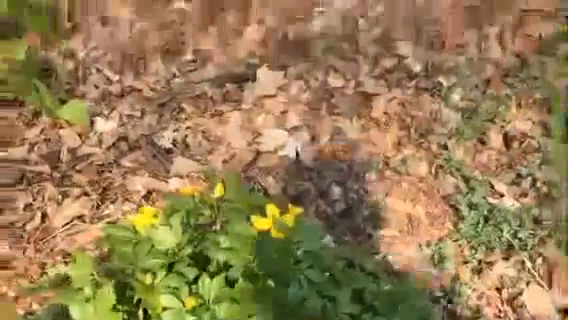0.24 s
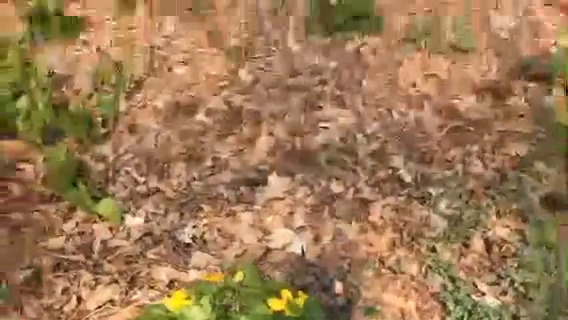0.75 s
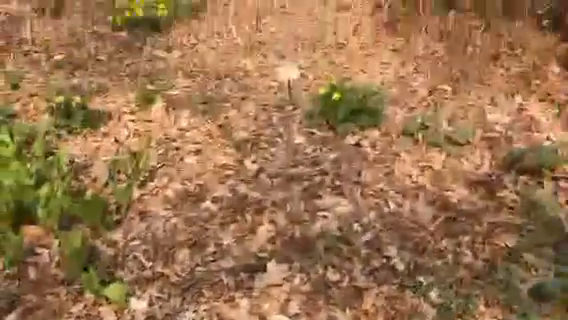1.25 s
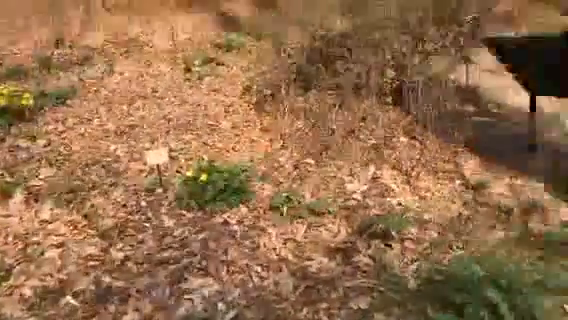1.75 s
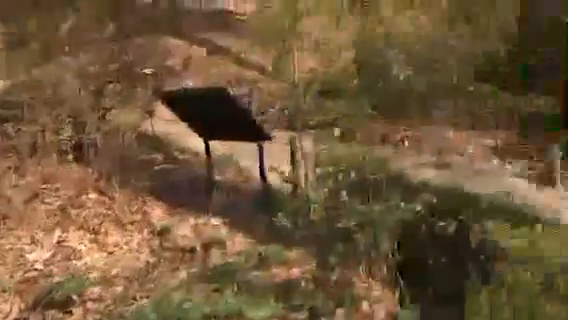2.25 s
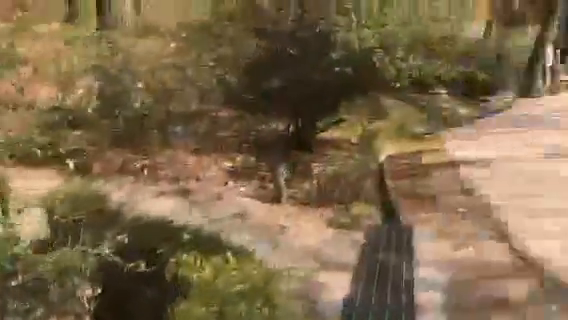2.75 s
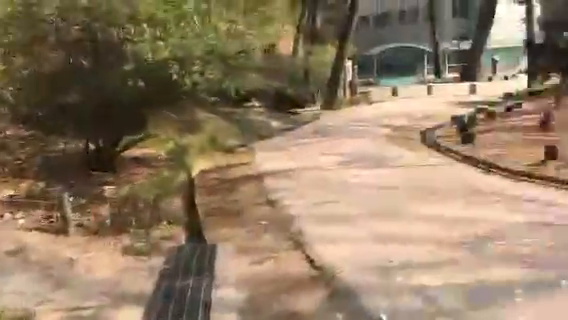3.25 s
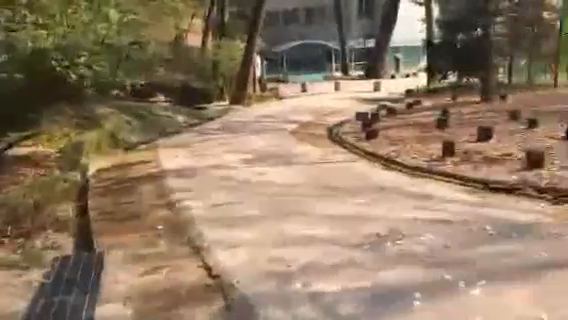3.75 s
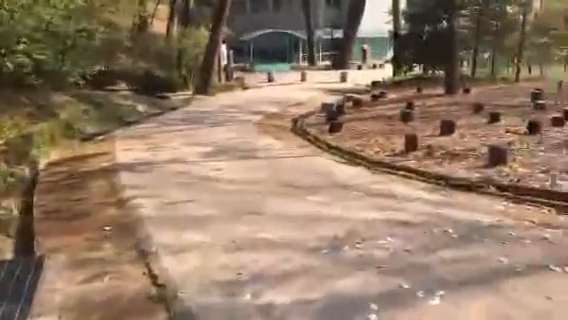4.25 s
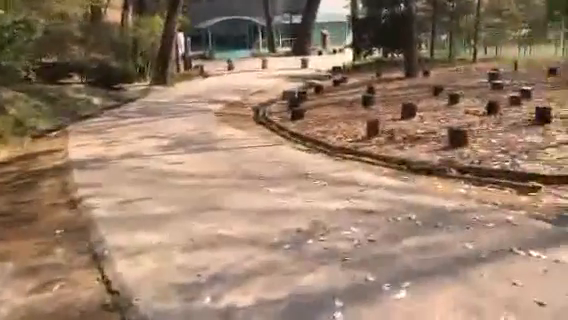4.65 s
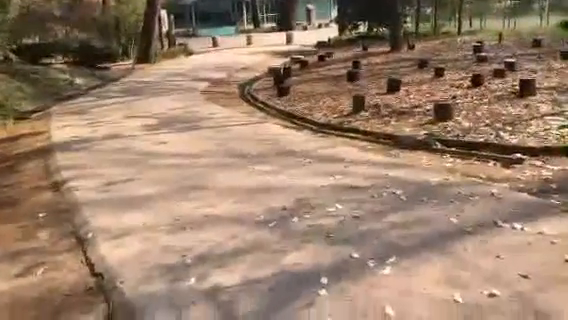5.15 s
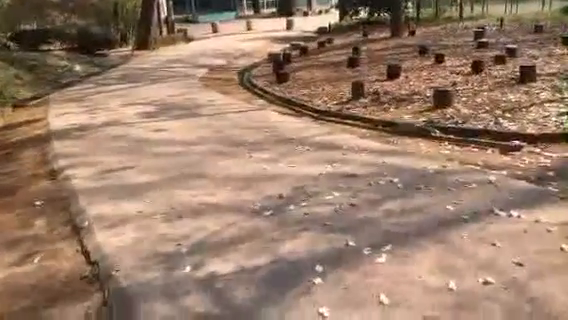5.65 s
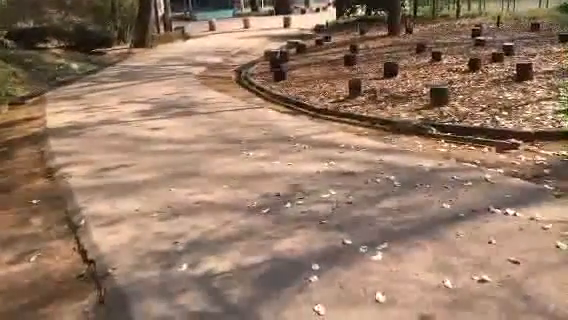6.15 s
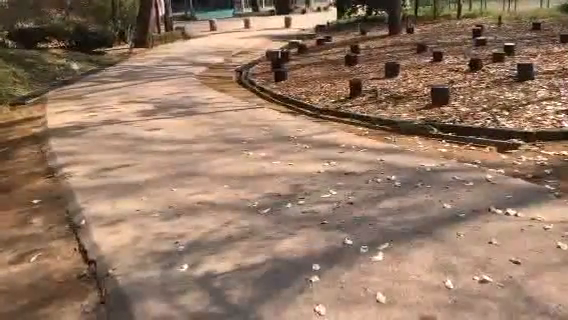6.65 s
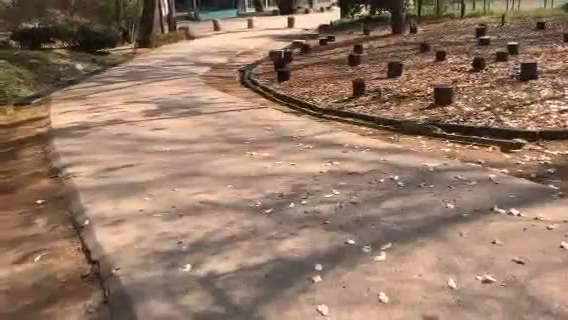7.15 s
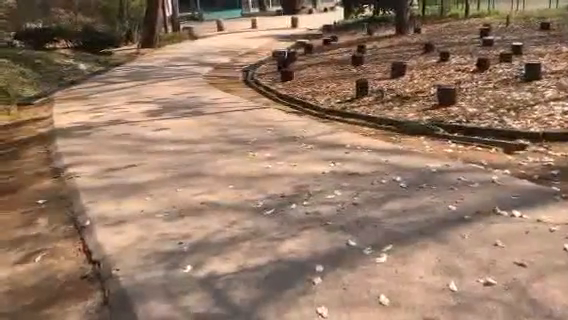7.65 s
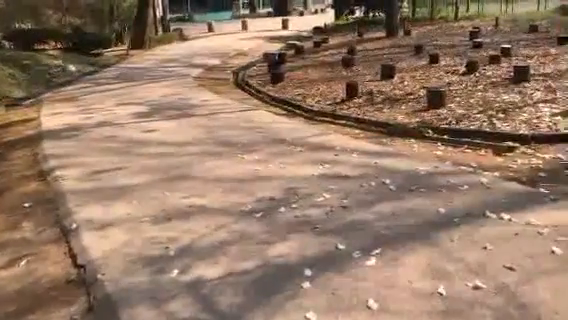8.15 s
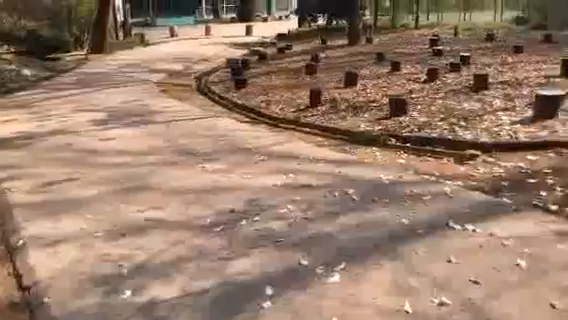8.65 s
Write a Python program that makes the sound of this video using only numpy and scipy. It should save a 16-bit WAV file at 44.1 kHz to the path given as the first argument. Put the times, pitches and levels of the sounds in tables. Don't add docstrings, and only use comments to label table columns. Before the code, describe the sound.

A quiet park captured by a hand-held phone, both channels nearly identical and treble muffled. Throughout, a faint wavering low machine hum sits over soft town hiss and swelling distant traffic rumble. From 0 s feet rasp dry leaves and grit; sharp twig cracks cluster at 0.6-0.8 s, with lighter scuffs and snaps until about 4.4 s. Two short buzzing bird calls open, returning around 2 and 3 s. From 0.45 to 2.5 s a small bird repeats held whistles, steep high notes and quick falling notes, echoing in the trees; fainter slurred chirps surround it. At 4.5 and 4.9 s the phone case is knocked hard, two sharp clacks with dull thumps and rattles fading by 5.3 s. The bird sings a second, steadier phrase from 5.35 to 7.9 s over little foot noise. From 7.8 to 8.6 s fingers tick the case with leaf scuffs and low bumps; a last faint buzz ends at 8.9 s.

```python
import sys
import numpy as np
from scipy import signal
from scipy.fft import rfft, irfft, next_fast_len
from scipy.io import wavfile
from scipy.ndimage import uniform_filter1d

SR = 44100
rng = np.random.default_rng(int(sys.argv[2]) if len(sys.argv) > 2 else 0)


def nominal_scale(level):
    x = np.asarray(level, float) / 20
    return 10 ** x


def generate_wav(signal):
    frames = np.transpose(np.atleast_2d(signal))
    scaled = np.clip(frames, -1, 1) * 32767
    pcm = np.round(scaled).astype(np.int16)
    wavfile.write(sys.argv[1], SR, pcm)


N = 392049
T = np.arange(N) / SR


def level(x, db):
    return x * nominal_scale(db) / np.sqrt(np.mean(x ** 2))


def add(track, s, sound):
    i = int(s * SR)
    track[i:i + len(sound)] += sound[:N - i]


def colour(x, points):
    hz, db = np.transpose(points)
    size = next_fast_len(len(x))
    bins = np.maximum(np.arange(size // 2 + 1) * SR / size, 1)
    gain = nominal_scale(np.interp(np.log(bins), np.log(hz), db, left=-60, right=-80))
    return irfft(rfft(x, size) * gain, size)[:len(x)]


def ring(x, hz, width):
    return signal.lfilter(*signal.iirpeak(min(hz, .45 * SR), hz / width, SR), x)


def walk(rate):
    k = int(SR / rate)
    steps = np.repeat(rng.standard_normal(N // k + 1), k)
    return 1.32 * uniform_filter1d(uniform_filter1d(steps, k), k)[:N]


def tone(hz, edge):
    sine = np.sqrt(2) * np.sin(2 * np.pi * np.cumsum(hz) / SR)
    return sine * signal.windows.tukey(len(hz), np.clip(edge, 0, 1))


def glide(length, *hz):
    return np.interp(np.linspace(0, len(hz) - 1, int(length * SR)), np.arange(len(hz)), hz)


# pitch_hz, density_db (per Hz)
TOWN_SPECTRUM = [(27, -14.5), (58, -1), (85, -6.5), (150, -14.5), (220, -16), (350, -23.5), (600, -23.5),
                 (950, -22), (1600, -31.5), (2500, -38.5), (4000, -37), (5050, -41.5), (7300, -42),
                 (7900, -47.5)]
# time_s, level_db
RUMBLE_SWELL = [(0.0, -60), (0.47, -57), (3.12, -53.5), (3.49, -61), (4.95, -51.5), (5.45, -60.5),
                (6.07, -49.5), (6.49, -66.5), (6.96, -48), (7.01, -62), (7.57, -49), (8.18, -59.5),
                (8.33, -43), (8.39, -62), (8.57, -52), (8.89, -64)]
# time_s, level_db
VEHICLE_SWELL = [(0, -80.5), (2.5, -69.5), (5.5, -67.5), (7, -66), (8.89, -69)]


def town():
    hiss = level(colour(rng.standard_normal(N), TOWN_SPECTRUM), -55.5) * nominal_scale(0.27 * walk(0.92))

    s, db = np.transpose(RUMBLE_SWELL)
    rumble = level(ring(ring(rng.standard_normal(N), 58, 22), 58, 45), -1.5)
    rumble = rumble * nominal_scale(np.interp(T, s, db) + 1.5 * walk(6.5))

    hum_hz = 116.1 + 0.58 * walk(3)
    hum = np.sqrt(2) * np.sin(2 * np.pi * np.cumsum(hum_hz) / SR) * nominal_scale(-58.5 + 1.4 * walk(5))

    s, db = np.transpose(VEHICLE_SWELL)
    vehicle = level(ring(ring(rng.standard_normal(N), 250, 190), 270, 400), 0) * nominal_scale(np.interp(T, s, db))
    return hiss + rumble + hum + vehicle


def trees(x, wet_db, t60, branches=4.5, flutter_db=3.5):
    t = T[:SR * 3 // 4]
    fade = nominal_scale(-60 * t / t60) + branches * np.exp(-t / 0.008)
    tail = rng.standard_normal(len(t)) * fade * (1 - np.exp(-t / 0.0024))
    wet = signal.fftconvolve(x, tail / np.sqrt(np.sum(tail ** 2)))[:N]
    return x * nominal_scale(flutter_db * walk(150)) + nominal_scale(wet_db + 2.5 * walk(45)) * wet


# start_s, length_s, from_hz, to_hz, level_db
SLURRED_NOTES = [(1.008, 0.097, 4800, 3350, -72), (1.29, 0.08, 3800, 3130, -74),
                 (1.49, 0.048, 4750, 3800, -71), (1.552, 0.06, 3470, 3150, -75),
                 (1.615, 0.086, 3985, 3960, -66.5), (1.722, 0.06, 5080, 3700, -68),
                 (1.778, .08, 3650, 3170, -71), (2.244, 0.14, 3350, 3550, -78.5),
                 (2.899, 0.074, 3380, 3950, -70), (2.342, 0.014, 2500, 3700, -72),
                 (1.733, .014, 3600, 2500, -74), (6.598, .035, 3150, 3750, -71.5),
                 (3.555, 0.024, 2900, 3450, -79), (3.75, 0.15, 4290, 4240, -80.5),
                 (3.997, 0.059, 3300, 3840, -81), (4.023, 0.17, 4370, 4350, -82),
                 (4.27, 0.16, 4390, 4330, -81.5), (0.69, 0.29, 530, 528, -77.5)]
# start_s, length_s, centre_hz, level_db, far (1 if hidden in the trees)
BUZZING_CALLS = [(0.061, 0.031, 4050, -55.5, 0), (0.147, 0.043, 3950, -56.5, 0),
                 (1.92, 0.046, 4000, -62, 0), (2.046, 0.04, 3900, -59, 0), (2.152, 0.044, 4020, -61.5, 0),
                 (2.855, 0.037, 3970, -64, 1), (2.914, 0.038, 4130, -66.5, 1),
                 (2.969, 0.032, 3900, -65.5, 1), (3.04, .04, 4150, -72, 1), (3.105, 0.03, 3900, -68, 1),
                 (3.246, 0.04, 3930, -69.5, 1), (8.847, 0.037, 3770, -64, 0.96)]


def other_birds():
    near, hidden, far = calls = np.zeros((3, N))
    for s, length, from_hz, to_hz, db in SLURRED_NOTES:
        add(far, s, nominal_scale(db) * tone(glide(length, from_hz, to_hz), 0.19))
    for s, length, hz, db, distant in BUZZING_CALLS:
        centre = glide(length, hz, .96 * hz, hz, 1.03 * hz, .96 * hz)
        swing = np.sin(2 * np.pi * np.cumsum(glide(length, 150, 175)) / SR)
        drop = glide(.012, .95 * hz, .55 * hz)
        pitch = np.append(centre * (1 + 0.15 * swing), drop)
        swell = np.linspace(.55, 1, len(swing)) ** 1.5
        throb = np.append(swell * (1 + 0.36 * swing), np.linspace(.4, .12, len(drop)))
        third_db = np.where(np.arange(len(pitch)) < len(swing), -13, -4)
        buzz = tone(pitch, 0.29) + nominal_scale(third_db) * tone(1.5 * pitch, .2)
        add(calls[int(distant > .5)], s, nominal_scale(db) * throb * buzz)
    near = trees(near, -8, 0.27)
    hidden = nominal_scale(-8.5) * trees(hidden, 10.5, 0.79, 1.5)
    return near + hidden + trees(far, -4, .7, 1.5, 2.2)


# start_s, length_s, level_db, swell_db (over the note), pitch_hz
HELD_WHISTLES = [(0.544, .114, -62, 8, 4010), (0.873, 0.112, -59.5, 4, 3948), (1.198, 0.145, -64, 2, 4043),
                 (1.538, 0.054, -60, -10, 3935), (1.864, 0.135, -62, 1, 3960),
                 (2.194, 0.115, -55.5, 8, 3982), (5.443, 0.098, -63, -3, 4065),
                 (5.774, 0.115, -61, -3, 4005), (6.089, 0.13, -56.5, -3, 3963),
                 (6.423, 0.098, -53, 3, 4004), (6.757, 0.096, -57, -3.5, 3980),
                 (7.083, 0.108, -55, 0, 3970), (7.42, 0.093, -54.5, 5, 3940), (7.772, 0.1, -59, 3, 4050)]
WHISTLE_HOOKS = .1, .165
# start_s, peak_db, lowest_hz, rise_db (level of the rise that follows)
STEEP_NOTES = [(1.0207, -59.5, 5410, -82), (1.3596, -56.5, 5580, -74.5), (1.6926, -59.5, 5650, -79.5),
               (2.019, -56, 5420, -74), (2.376, -52, 5430, -69.5), (5.602, -61.5, 5420, -87),
               (5.934, -57.5, 5430, -79.5), (6.2582, -56.5, 5830, -74.5), (6.5868, -53.5, 5840, -71.5),
               (6.915, -54.5, 5590, -76), (7.2504, -55.5, 5670, -75), (7.585, -56.5, 5840, -71.5)]
# start_s, peak_db
FALLING_NOTES = [(0.4454, -66), (1.104, -58.5), (1.437, -55.5), (1.7756, -55.5), (2.1062, -53.5),
                 (2.4536, -49.5), (5.35, -63.5), (5.684, -55.5), (6.0112, -51.5), (6.3393, -49),
                 (6.6658, -50), (6.999, -50), (7.325, -50), (7.6615, -48.5)]


def songbird():
    near, high, falls, echo = np.zeros((4, N))
    attack_s, release_s, hook_s, echo_t60_s = 0.04, 0.02, 0.013, 1.1
    second_phrase_s = 4
    for s, length, db, swell_db, hz in HELD_WHISTLES:
        t = T[:int(length * SR)]
        edge = np.maximum(np.maximum(1 - t / attack_s, 1 - (length - t) / release_s), 0)
        shape_db = db + 2 + swell_db * (t / length - .5) - 14 * edge
        hook = WHISTLE_HOOKS[int(s > second_phrase_s)] * np.exp(-t / hook_s)
        add(near, s, nominal_scale(shape_db) * tone(hz * (1 - hook), 0.024))
        t = T[:SR // 2]
        add(echo, s + length - .022, nominal_scale(db - 9 - 60 * t / echo_t60_s) * tone(hz + 0 * t, .1))

    for s, db, low_hz, rise_db in STEEP_NOTES:
        plunge = glide(0.022, 7300, 1.14 * low_hz, 1.035 * low_hz, 1.003 * low_hz, .985 * low_hz)
        plunge_db = db - 6.5 + glide(0.022, -10, -3, -0.5, 1, -2)
        add(high, s - .003, nominal_scale(plunge_db) * tone(plunge, 0.28))
        add(high, s + 0.023, nominal_scale(db - 12) * tone(glide(.009, 5400, 3900), 0.28))
        add(high, s + 0.062, nominal_scale(rise_db + 4.5) * tone(glide(0.026, 5100, 6500, 7300), 0.29))

    for s, db in FALLING_NOTES:
        fall = glide(.042, 5130, 5060, 4800, 4400, 4070, 3850)
        add(falls, s - .006, nominal_scale(db - 7 + glide(.042, 1.5, -2.5)) * tone(fall, 0.75))

    echo = echo * nominal_scale(5.5 * walk(120))
    near = trees(near, -10, .5, 2.5, 3)
    falls = trees(falls, 1.5, .9, 3.8, 4.4)
    high = nominal_scale(-2) * trees(high, 5.5, 0.82, 2.5, 4.5)
    return echo + near + falls + high


# pitch_hz, density_db (per Hz)
LEAF_SPECTRUM = [(300, -11), (700, 1), (1500, 2.5), (2800, -0.5), (5000, -4), (7000, -5), (7900, -14)]
# start_s, length_s, from_db, to_db, brightness_db
LEAF_SCUFFS = [(0, 0.23, -96, -75, 9.5), (0.244, 0.15, -72, -72.5, -10), (0.553, 0.15, -73, -59.5, 8),
               (0.679, 0.099, -68.5, -69, 8.5), (0.754, 0.14, -65, -75, 9), (0.84, 0.13, -66, -69.5, -14),
               (1.248, 0.12, -65.5, -68.5, -9), (1.913, 0.13, -59, -74, -0.5),
               (1.996, .25, -71.5, -70.5, 0.5), (2.651, 0.13, -71, -57.5, -8.5),
               (2.737, 0.2, -66, -64, -7.5), (2.89, 0.47, -77, -92, 4), (3.266, 0.3, -65, -69, -9.5),
               (3.486, 0.89, -83, -76.5, -2), (4.474, 0.036, -49, -47, -20), (4.487, 0.18, -63.5, -67, -4),
               (4.876, 0.04, -38.5, -50, -3.5), (4.909, 0.079, -48.5, -66, -1),
               (4.927, 0.44, -67, -73.5, 1), (7.877, 0.11, -62, -63, -2), (7.974, 0.18, -70, -93, -4),
               (8.167, 0.16, -56, -73, -7.5), (8.377, 0.15, -84, -48, -6), (8.494, 0.2, -74.5, -72, -1.5)]


def leaves():
    chance = rng.random((N, 2)).T
    sizes = nominal_scale(np.minimum(-3.2 * np.log(1 - chance[1]), 12))
    cracks = (chance[0] < 900 / SR) * sizes
    bursts = signal.lfilter([1], [1, -np.exp(-1 / (0.0024 * SR))], cracks)
    grit = (bursts * nominal_scale(2.9 * walk(30)) + 1.5) * rng.standard_normal(N)
    grit = colour(grit, LEAF_SPECTRUM)
    low = signal.sosfiltfilt(signal.butter(2, 3300, fs=SR, output="sos"), grit)
    low, high = level(low, 0.74), level(grit - low, 0.21)
    out = np.zeros(N)
    for s, length, from_db, to_db, bright_db in LEAF_SCUFFS:
        part = slice(int(s * SR), int((s + length) * SR))
        sound = low[part] + nominal_scale(bright_db) * high[part]
        sweep = nominal_scale(np.linspace(from_db, to_db, len(sound)))
        add(out, s, sound * sweep * signal.windows.tukey(len(sound), .45))
    return out


# pitch_hz, width_hz
SNAP_RESONANCES = [(950, 1010), (5600, 1940)]


def snaps(table, t60, crack):
    out = np.zeros(N)
    lead = .006
    t = T[:int(.08 * SR)] - lead
    creak = 0.2 * np.exp(t / 0.0032)
    rattle = nominal_scale(-60 * t / t60) + nominal_scale(-16 - 60 * t / .05)
    for s, mid_db, low_db, high_db, ring_hz in table:
        burst = rng.standard_normal(len(t)) * np.where(t < 0, creak, rattle)
        burst[np.argmax(t >= 0)] = crack
        bands = [(ring_hz, 1150)] + list(SNAP_RESONANCES)
        for (hz, width), db, detune in zip(bands, (mid_db, low_db, high_db), rng.standard_normal(3)):
            part = ring(ring(burst, hz * (1 + detune / 20), width), hz, 1.35 * width)
            add(out, s - lead + .0008, nominal_scale(db + 2.5) * part / np.max(abs(part)))
    return signal.sosfilt(signal.butter(2, 470, "high", fs=SR, output="sos"), out)


# start_s, mid_db, low_db, high_db, ring_hz
TWIG_SNAPS = [(.0745, -50, -66, -60, 3900), (0.1311, -52, -66, -68, 3500), (0.2836, -57, -51, -67, 2600),
              (.355, -62, -65, -62, 3500), (0.5774, -57, -58, -55, 2830), (.5905, -60, -64, -53, 3000),
              (0.604, -63, -64, -51, 3800), (0.6255, -37.5, -60, -45.5, 3700),
              (0.6489, -43, -58, -41, 2450), (0.6709, -35, -40.5, -34.5, 2850), (.678, -45, -48, -45, 3500),
              (0.6884, -46, -54, -58, 1600), (0.7233, -47, -58, -47, 3290), (.7275, -56, -64, -50, 3500),
              (.752, -58, -66, -54, 4000), (.742, -58, -64, -56, 2500), (.799, -56, -64, -57, 4100),
              (.88, -58, -62, -70, 2300), (.896, -58, -64, -70, 2400), (.953, -60, -64, -74, 2300),
              (0.7766, -52, -66, -57, 2920), (1.2735, -62, -63, -51, 1300), (1.2999, -54, -65, -66, 2300),
              (1.9435, -59, -58, -55, 1960), (2.7422, -54, -55, -63, 2130), (2.7916, -55, -54, -66, 2010),
              (2.905, -63, -60, -70, 2000), (3.01, -62, -68, -59, 2800), (3.3278, -47.5, -64, -62, 1300),
              (3.357, -58, -62, -70, 2200), (3.3942, -56, -70, -72, 1480), (3.485, -64, -52, -60, 1340),
              (3.7125, -54.5, -70, -70, 2480), (3.8, -67, -70, -60, 3800), (3.9469, -66, -43.5, -70, 2430),
              (4.18, -61, -71, -61, 4200), (4.36, -69, -71, -62, 3800)]


def twigs():
    return snaps(TWIG_SNAPS, t60=0.02, crack=8)


# start_s, mid_db, low_db, high_db, ring_hz
CASE_KNOCKS = [(4.4785, -52, -48, -60, 3000), (4.483, -44, -41, -62, 2200), (4.4865, -40, -31.5, -60, 2500),
               (4.4907, -38, -29.5, -62, 2000), (4.4972, -26, -26, -49, 2130),
               (4.5005, -36, -37, -61, 2200), (4.569, -51, -60, -54, 2240), (4.604, -62, -58, -55, 3000),
               (4.883, -41, -50, -37, 4500), (4.878, -48, -43, -46, 3800), (4.8858, -21, -21.5, -28, 3700),
               (4.8927, -25, -44, -56, 1550), (4.8964, -24.5, -38, -48, 1300), (4.901, -40, -41, -49, 2000),
               (4.9074, -40, -33, -41, 1460), (4.92, -46, -46, -56, 1300), (4.9447, -36, -44, -41, 3000),
               (4.9906, -45, -60, -57, 1320), (5.015, -54, -47, -72, 2080), (5.0365, -54, -52, -62, 2500),
               (5.0479, -50, -57, -70, 1350), (5.1248, -46, -41.5, -46, 2020),
               (5.1826, -61, -55, -62, 2000), (5.2475, -62, -58, -64, 2000)]


def case_knocks():
    return snaps(CASE_KNOCKS, t60=0.022, crack=12)


# start_s, mid_db, low_db, high_db, ring_hz
FINGER_TICKS = [(6.8329, -58, -65, -52, 1630), (7.8062, -31, -27, -43, 3250), (7.899, -49, -56, -52, 3000),
                (7.939, -60, -50, -57, 3000), (7.9099, -34.5, -39, -39, 3020),
                (7.9468, -38.5, -56, -42, 1460), (7.9694, -58, -57, -58, 1460),
                (8.0556, -52.5, -56, -54, 3130), (8.1733, -56, -44.5, -50.5, 1500),
                (8.19, -53, -56, -56, 3000), (8.2112, -38, -30.5, -61, 1520), (8.215, -37, -39, -56, 2980),
                (8.2786, -54.5, -57, -54.5, 3000), (8.357, -55, -62, -58, 3000),
                (8.3943, -34.5, -43, -38, 3030), (8.439, -59, -50, -66, 2500),
                (8.4589, -29.5, -31.5, -32.5, 1900), (8.4635, -40, -39, -40, 2300),
                (8.4956, -33.5, -42, -40, 2400), (8.5044, -56, -48, -48, 1420),
                (8.6103, -46.5, -71, -63, 2400), (8.617, -62, -60, -59, 2000)]


def finger_ticks():
    return snaps(FINGER_TICKS, t60=0.025, crack=7)


# peak_s, pitch_hz, level_db, rise_s, t60_s
BODY_THUMPS = [(2.2, 62, -47, 0.028, 0.14), (4.506, 100, -22, 0.012, 0.1), (4.498, 167, -38, 0.012, 0.24),
               (4.5, 227, -38.5, 0.012, 0.078), (4.895, 290, -32.5, 0.0084, 0.049),
               (4.89, 193, -37, 0.0034, 0.072), (4.885, 103, -30.5, 0.0047, 0.028),
               (4.495, 326, -43.5, 0.0068, 0.055), (4.497, 637, -37, 0.0041, 0.077),
               (4.897, 598, -32.5, 0.0051, 0.056), (4.495, 410, -46, .005, .06),
               (4.494, 760, -41, .004, .05), (4.492, 1130, -43, .004, .05), (4.892, 400, -41, .004, .05),
               (4.899, 1140, -37, .003, .06), (3.952, 530, -45, 0.0013, 0.026),
               (8.32, 76, -36, 0.0093, 0.14), (8.278, 92, -40, 0.0076, 0.071),
               (8.475, 206, -42.5, 0.0067, 0.16), (8.2, 132, -52, 0.024, 0.22)]


def body_thumps():
    out = np.zeros(N)
    lead = .12
    t = T[:SR // 2] - lead
    for s, hz, db, rise, t60 in BODY_THUMPS:
        swell = np.where(t < 0, np.exp(-(t / rise) ** 2 / 2), nominal_scale(-60 * np.maximum(t, 0) / t60))
        add(out, s - lead, nominal_scale(db) * swell * np.cos(2 * np.pi * hz * t))
    return out


def scene():
    birds = nominal_scale(-2) * songbird() + nominal_scale(1) * other_birds()
    feet = leaves() + twigs()
    handling = case_knocks() + finger_ticks() + body_thumps()
    mono = town() + birds + feet + handling
    return np.array([mono, mono])


# pitch_hz, level_db
TREBLE_FLOOR = [(3100, -98), (4700, -95.5), (5000, -91.5), (5300, -96), (6900, -95), (7500, -94),
                (7700, -93.5), (7850, -84)]


def masking(x):
    spec = signal.stft(x, nperseg=1536)[2]
    first, count, size = 108, 30, 6
    band = spec[first:first + count * size].reshape(count, size, -1)
    db = 10 * np.log10(np.sum(abs(band) ** 2, axis=1) + 1e-30)

    slope = -0.79 * np.arange(count)[:, None]
    hidden = np.maximum.accumulate(db - slope, axis=0) + slope - 19
    hidden[2:] = np.maximum(hidden[2:], np.minimum(db[:-2], db[1:-1]) - 10.5)

    patches = uniform_filter1d(rng.standard_normal(db.shape), size=6, axis=1) * np.sqrt(6)
    band_hz = (first + size * (np.arange(count) + .5)) * SR / 1536
    quiet = np.interp(band_hz, *np.transpose(TREBLE_FLOOR))[:, None] + 3.2 * patches

    short_db = np.maximum(hidden, quiet) - db
    keep = 1 / (1 + np.exp(np.clip(short_db, -30, 30) / 1.3))
    spec[first:first + count * size] = (band * keep[:, None]).reshape(count * size, -1)
    return signal.istft(spec, nperseg=1536)[1][:N]


def low_pass(x):
    return signal.sosfilt(signal.butter(12, 8010, fs=SR, output="sos"), x)


def record(dry):
    steep = signal.ellip(12, .2, 105, 7680, fs=SR, output="sos")
    cut = signal.sosfilt(steep, masking(dry[0]))
    mix = cut + nominal_scale(-106) * rng.standard_normal((2, N))
    return low_pass(mix)


dry = scene()
out = record(dry)
generate_wav(out)
```